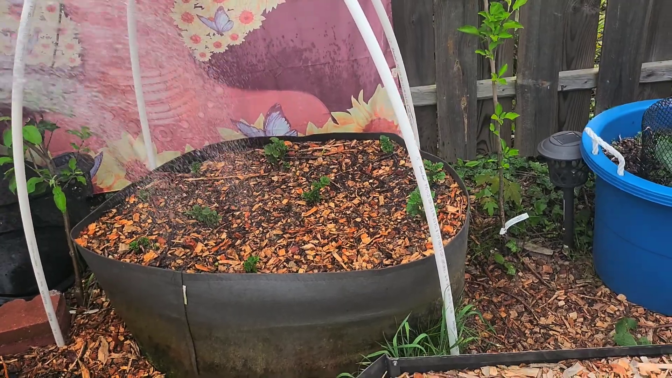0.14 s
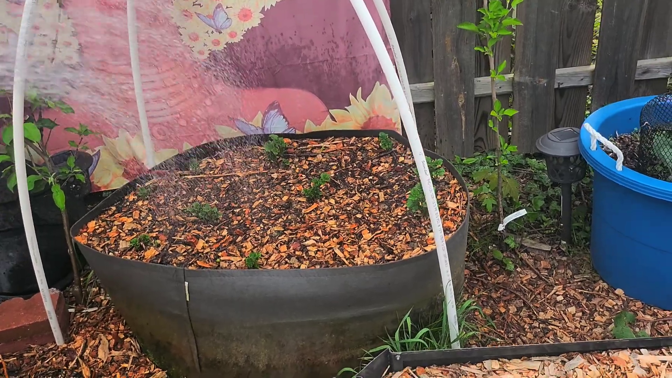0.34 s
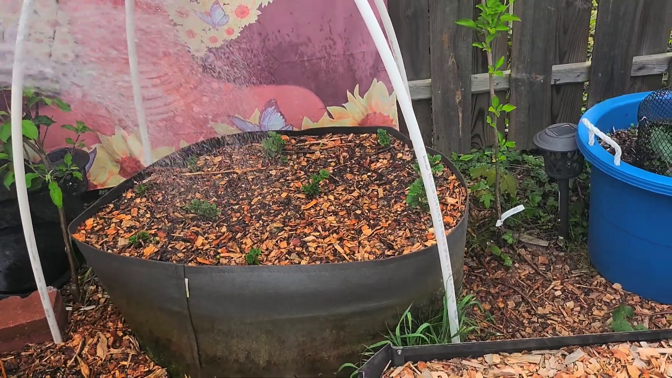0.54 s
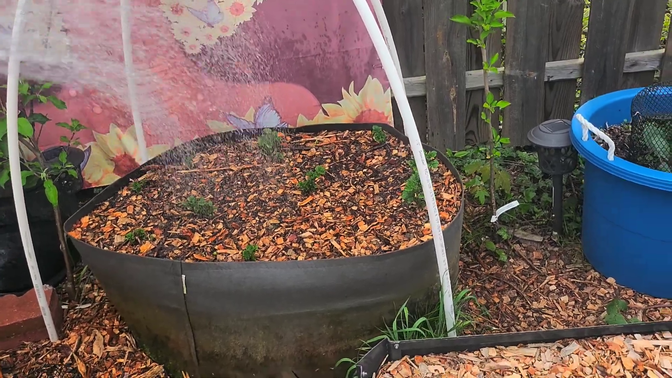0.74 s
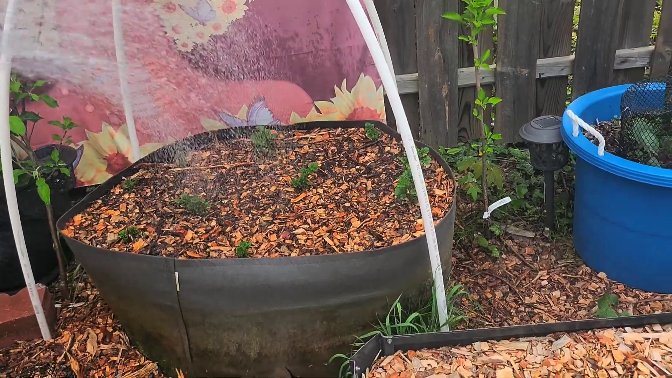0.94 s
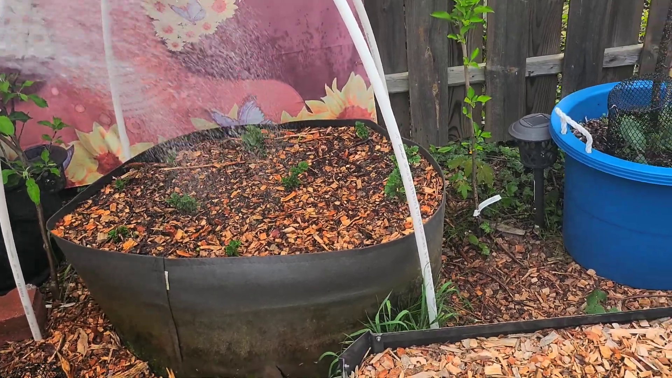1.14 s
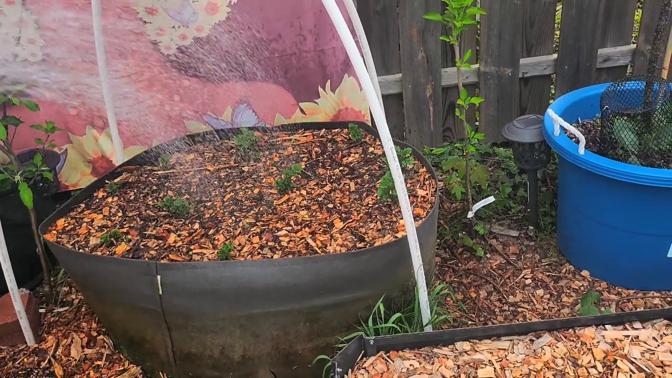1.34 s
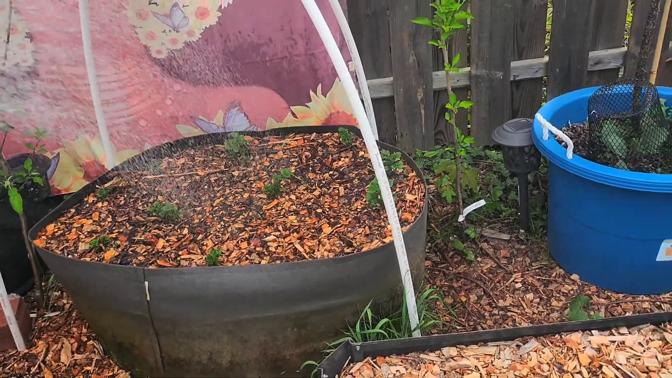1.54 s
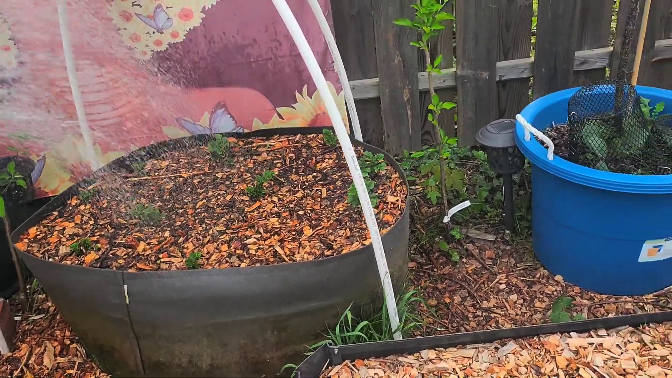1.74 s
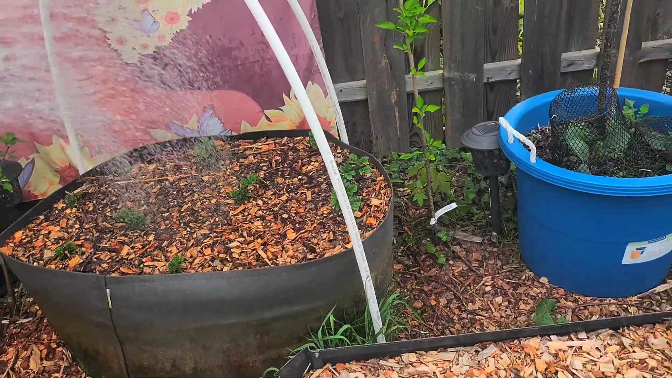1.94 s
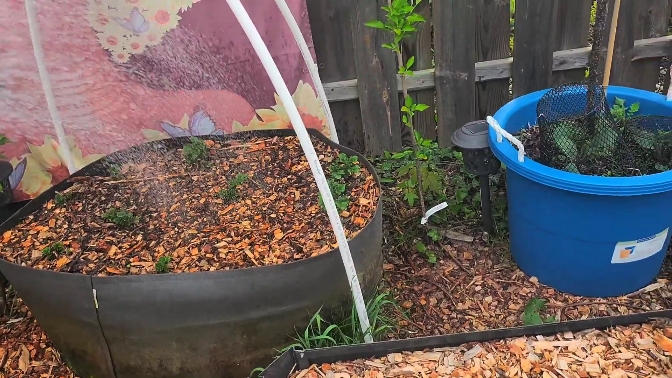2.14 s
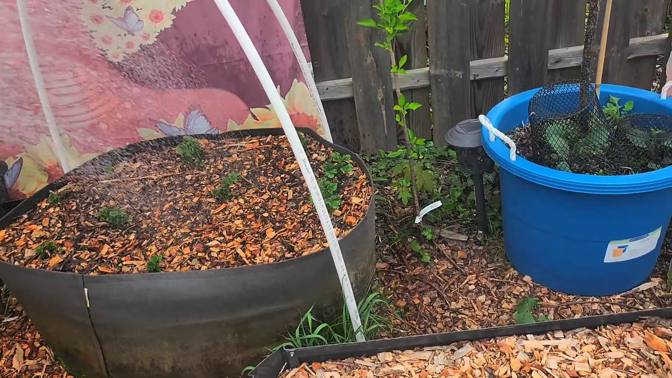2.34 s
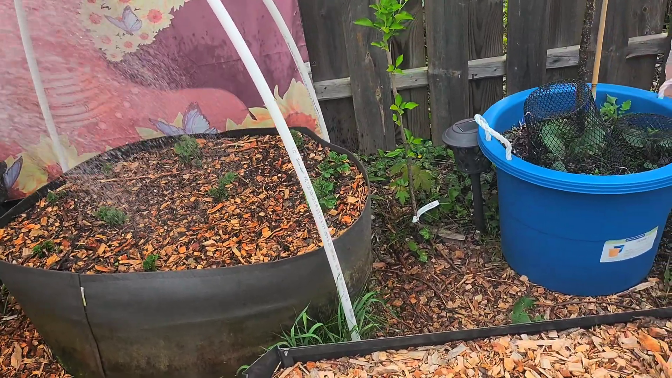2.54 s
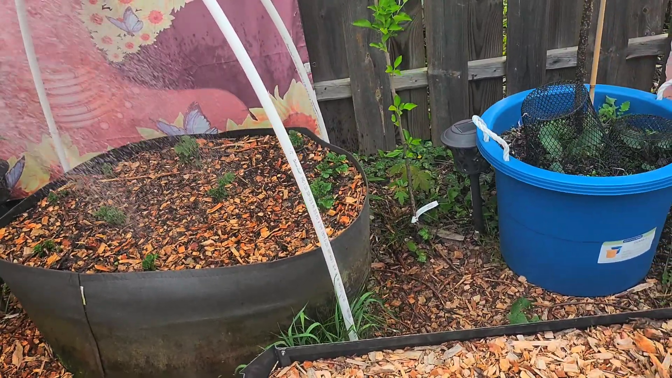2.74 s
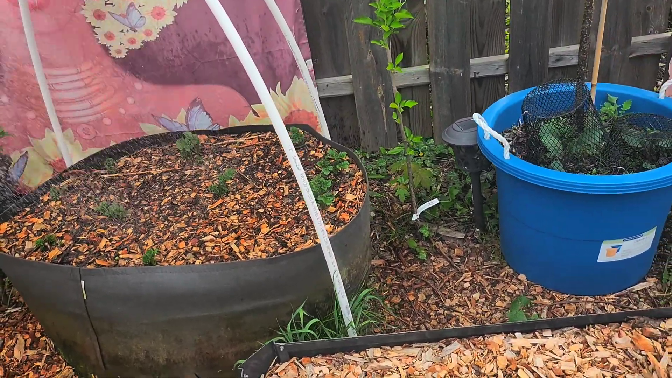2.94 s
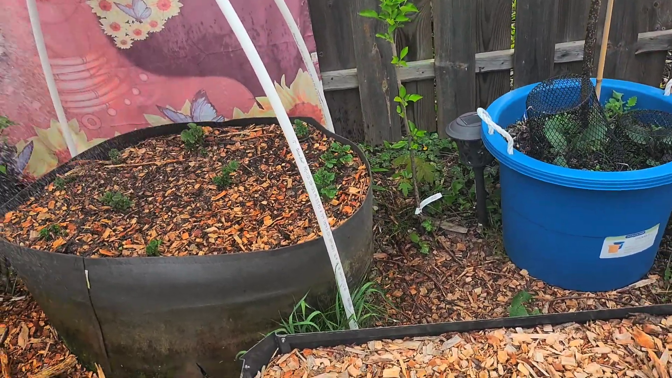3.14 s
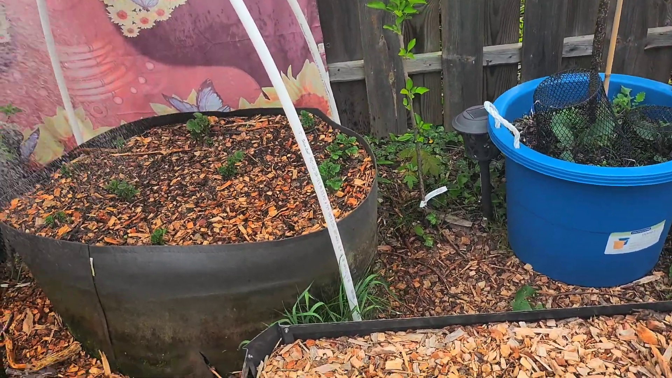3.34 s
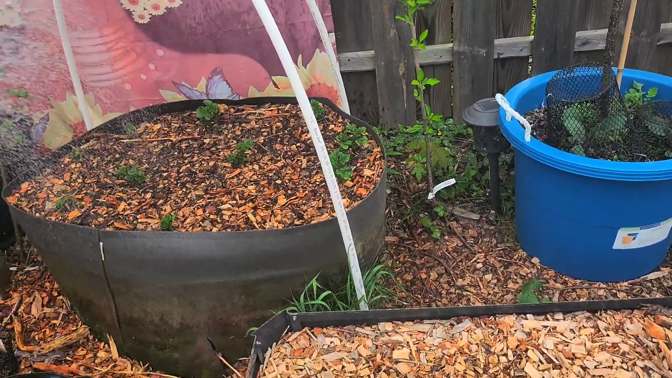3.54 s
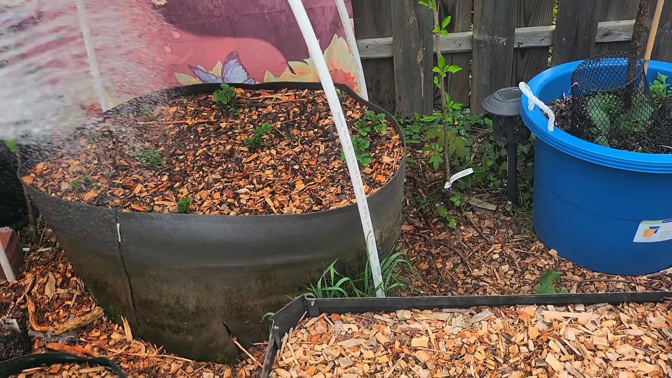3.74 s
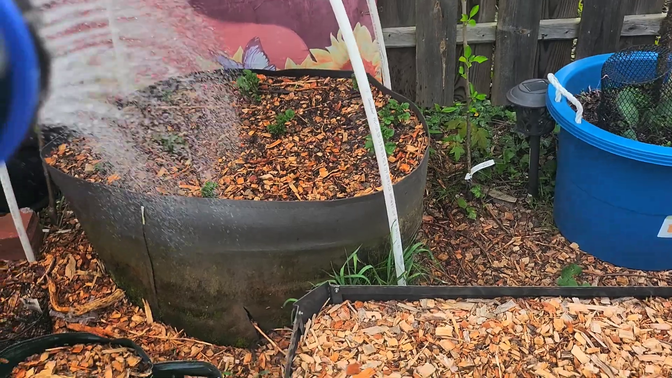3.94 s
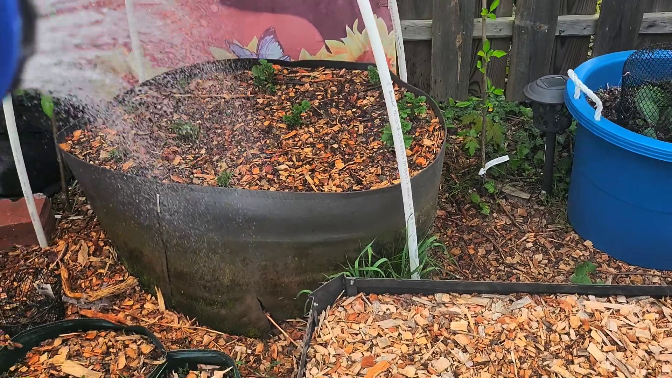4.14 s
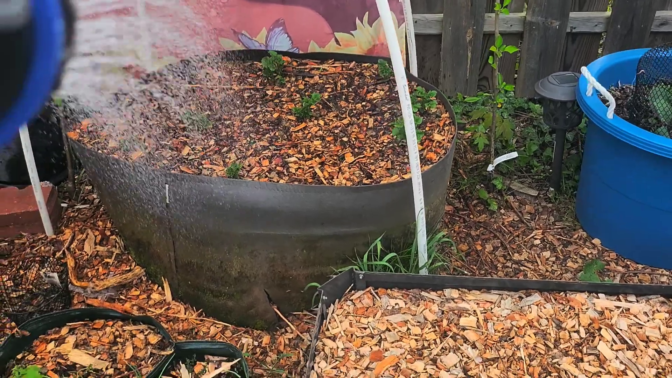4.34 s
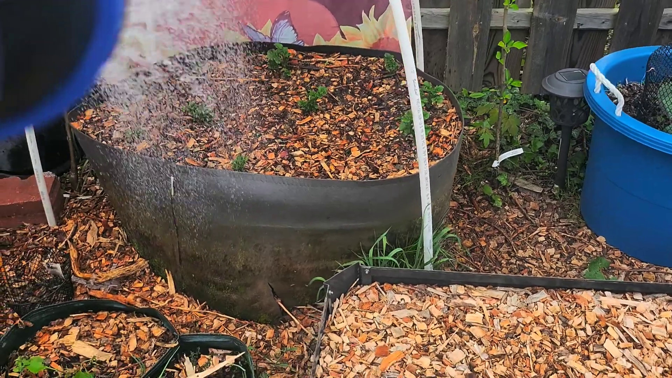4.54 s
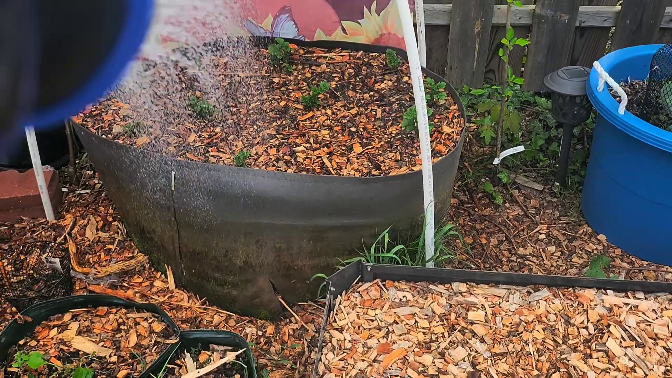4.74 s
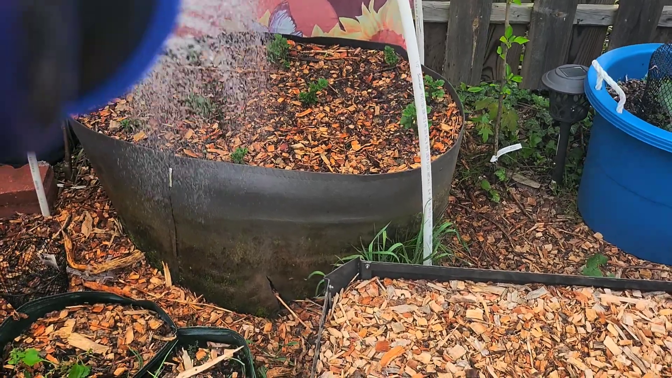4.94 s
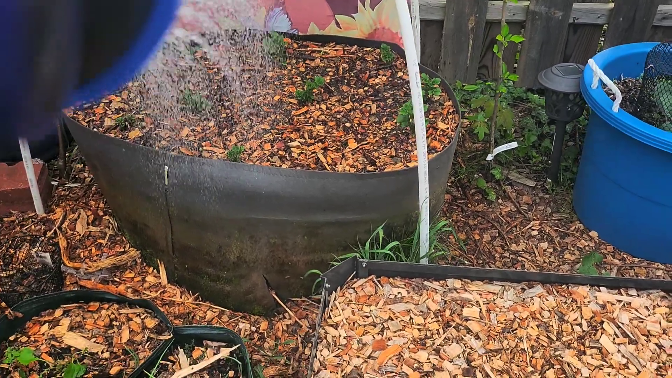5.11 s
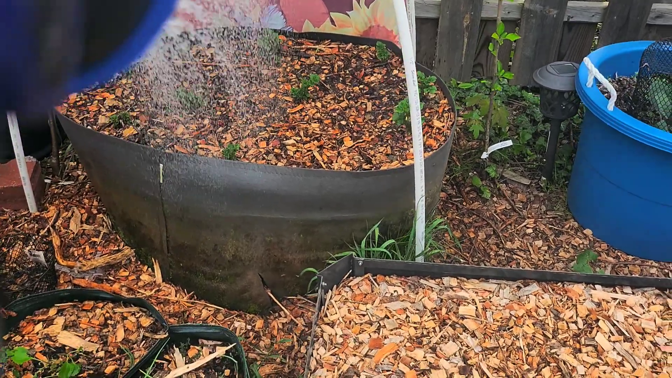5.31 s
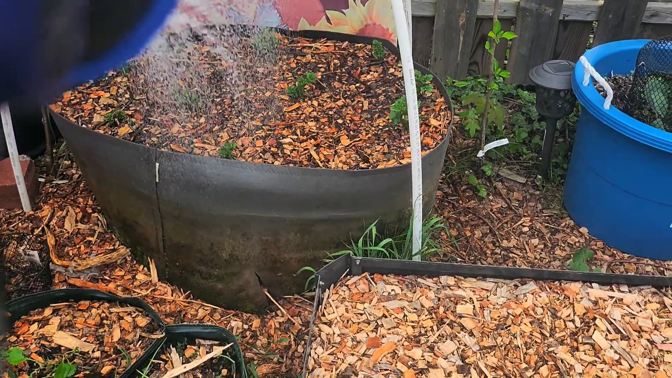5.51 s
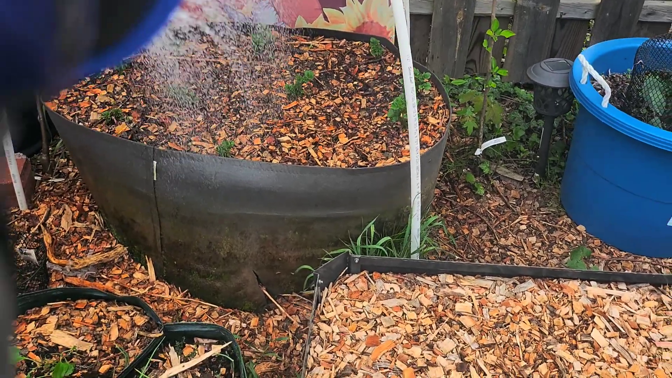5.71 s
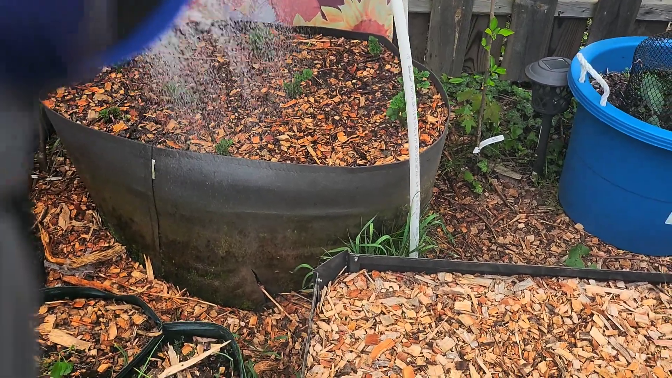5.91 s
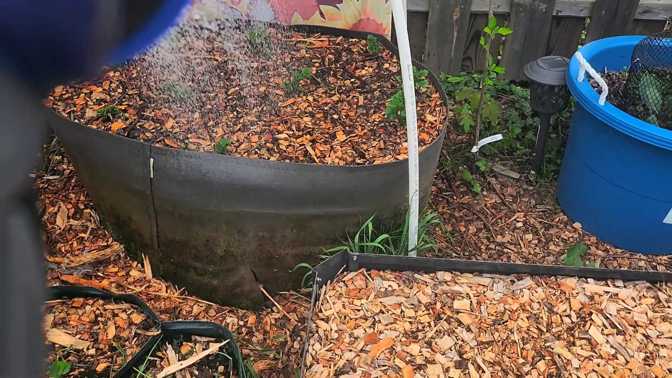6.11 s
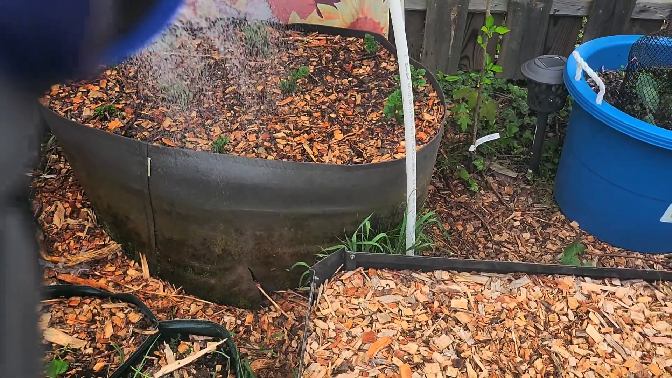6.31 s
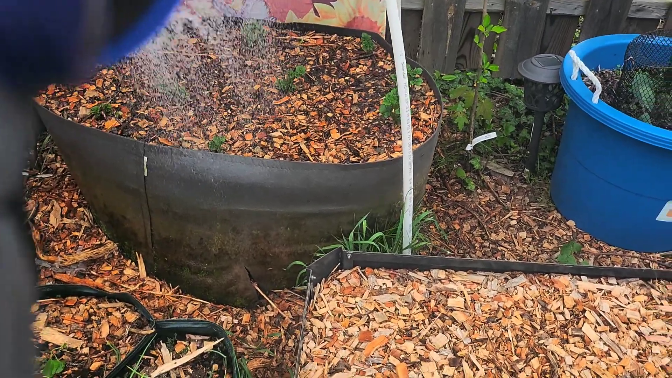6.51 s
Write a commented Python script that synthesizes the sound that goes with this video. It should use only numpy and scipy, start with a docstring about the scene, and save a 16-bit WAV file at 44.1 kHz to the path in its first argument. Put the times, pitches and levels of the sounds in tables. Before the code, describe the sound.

Constant airy water spray, stronger at left, shifts colour as the hand moves, over light pattering on mulch and a low far rumble.

```python
"""A hose nozzle left of a hand-held stereo microphone sprays a bed of wood mulch: noise shaped by a moving filter.
The hand moves it through six positions, each with its own reflections off hand and housing, so the hiss changes colour.
Water patters on the mulch as clicks over a noise wash, and a few heavy drops knock as damped sines.
Behind them far traffic rumbles as filtered noise, two engines drone as wavering sines and a far bird whistles."""
import sys
import numpy as np
from scipy import signal
from scipy.fft import rfft, irfft, next_fast_len
from scipy.io import wavfile
from scipy.ndimage import uniform_filter1d, map_coordinates

SR = 44100
rng = np.random.default_rng(int(sys.argv[2]) if len(sys.argv) > 2 else 0)


def store_pcm(level_fs):
    """Save levels as 16-bit WAV."""
    pcm = np.round(np.clip(level_fs, -1, 1) * 32767).astype(np.int16)
    wavfile.write(sys.argv[1], SR, np.atleast_2d(pcm).T)


def elevation(decibels):
    """Turn decibel levels (scalar or array-like) into linear amplitude ratios."""
    levels = np.asarray(decibels, float)
    return 10 ** (levels / 20)


N = 294147  # samples

# Flow through the nozzle. Each row: time in seconds, level in dB ahead of the housing's filter.
FLOW = [(0, -26.5), (2.6, -26.5), (3.1, -25.7), (3.6, -25.5), (3.8, -27), (4.05, -25.5), (4.3, -27),
        (4.75, -26.5), (6.3, -26.5), (6.67, -24.5)]
# The jet through the housing at the near (left) and shaded (right) microphone. Each row: frequency in Hz, gain in dB.
JET_NEAR = [(3310, -27), (4850, -8), (5180, -15), (6170, -5), (6730, -8), (7280, 3), (7940, -5), (8380, -2),
            (8930, -5), (9260, -1), (12240, 2), (13780, -6), (15440, 1), (15660, 0)]
JET_SHADED = [(3310, -19), (3530, -19), (3970, -12), (5620, -17), (5840, -21), (6060, -15), (6390, -18),
              (6950, -10), (7720, -7), (9150, -18), (9920, -15), (10360, -18), (11140, -13), (15660, -11)]
# What each of the six nozzle positions adds to those gains. Each row: frequency in Hz, gain in dB.
NEAR = [
    [(3310, 0), (4080, -11), (4850, -4), (5180, 4), (5840, -4), (7060, -3.5), (7940, 4.5), (8160, 2.5),
     (9700, -2.5), (9920, 0.5), (11690, -2.5), (13450, 5.5), (14110, -4), (15660, 2)],
    [(3310, -1), (3640, 1), (4080, -16.5), (5180, 3.5), (5620, -5), (7830, 4), (9590, -4), (9920, 1),
     (11800, -2), (12020, -0.5), (13560, 5.5), (13890, -6), (15210, 2), (15660, 2)],
    [(3310, 4), (4410, -8.5), (5510, 2.5), (6060, -6.5), (6620, 2.5), (6840, -14), (7060, -2), (8050, 2.5),
     (10030, -3.5), (13340, 3), (13780, 2), (14770, 4.5), (15320, 2), (15660, -2)],
    [(3310, -5), (3640, -11), (4080, 2.5), (5620, -6.5), (5950, 2), (6390, -5), (6620, 2), (8270, -4.5),
     (10030, -1.5), (10360, -9.5), (13120, 1.5), (13560, -6), (14990, 3.5), (15660, -1)],
    [(3310, -2), (3750, -1), (4190, 6), (5510, 0), (6060, 5), (7720, 0.5), (7940, -4), (8270, 1),
     (10690, 3.5), (13010, -6), (13780, -2), (14000, -3), (14880, -6), (15660, 1)],
    [(3310, -4.5), (4520, 10), (5400, -3.5), (5840, 6.5), (6280, 8), (6620, -7), (6840, 5), (7610, -4.5),
     (8490, 4.5), (11690, 7.5), (13560, -6.5), (14440, 3), (14990, 3), (15660, 0.5)],
]
SHADED = [
    [(3310, 4), (4520, 0), (5840, 3.5), (7280, 0), (7940, 8.5), (8490, -4), (8820, 4), (9480, -2),
     (9700, -7), (10030, 1), (11470, 4), (11910, -8), (15210, 8), (15660, 2)],
    [(3310, 4.5), (4200, 0), (4450, -2), (4900, 4), (5200, -1), (6500, 2), (6730, -3), (8050, 5),
     (8380, -9), (9370, 9), (9700, -6), (10030, 1), (12350, -4), (13010, -10), (13890, 4), (15100, 7),
     (15660, 2)],
    [(3310, 0), (4150, 0), (4400, -3), (4950, 3), (5500, -1), (6170, 0), (6390, 1), (6840, -2), (7060, 4),
     (8050, 5), (9260, 4), (10030, 2), (10250, -1), (11020, 4.5), (12680, -1), (13340, 2), (15100, 4),
     (15660, -3)],
    [(3310, -5), (4520, 2), (4700, 4), (4950, 9), (5730, -2), (5840, 5), (6280, -3), (6620, 2),
     (10250, 2.5), (11140, -3), (11800, 5), (13450, 2), (14330, -7), (15100, 2), (15660, 0)],
    [(3310, -2.5), (5070, 2), (5180, -5), (5400, 0), (7720, -3), (8380, 3), (9040, -4), (10470, 7),
     (11690, 0), (12130, 6), (12460, -4), (12900, 4), (15320, -6), (15660, 2)],
    [(3310, -0.5), (4520, -1), (5290, -6), (5510, 3), (7830, -1.5), (8160, -13), (8490, 4), (9700, -5),
     (10800, -5), (12570, 0.5), (13010, -8), (14110, 1), (14440, -8), (15660, -3)],
]
# How much further the shaded path's phase trails at each position. Each row: frequency in Hz, phase in radians.
TRAIL = [
    [(3310, 1), (3720, 2.5), (4410, -3.5), (4690, -1.3), (7030, 0.5), (7720, -0.3), (10200, 4.5),
     (10610, 5), (12270, 11), (13090, 14.2), (14610, 19.8), (15710, 24)],
    [(3310, 2.1), (3860, 2.5), (4130, 0), (4690, 4.9), (8130, 6), (9510, 9.9), (10890, 10.5), (11580, 15),
     (11990, 17.4), (13780, 22.0), (14060, 26), (15710, 28.3)],
    [(3310, 1.0), (4270, -1.5), (4690, 4.5), (7030, 8), (7580, 6), (8270, 6.8), (9920, 11), (10750, 11),
     (11710, 15), (12950, 13.5), (14190, 20), (15710, 20)],
    [(3310, 0), (4300, -0.7), (4600, -1.9), (4900, -1.5), (5170, -0.3), (6480, 1.8), (7030, 0.5),
     (7440, -0.5), (8410, 0.5), (12130, 6), (13510, 6.5), (13780, 3.4), (14330, -1), (15300, 10),
     (15710, 4)],
    [(3310, 3.1), (5370, 5.2), (6480, 17.1), (7440, 17.4), (8270, 14.1), (9780, 17.6), (10470, 24.2),
     (11160, 28), (12130, 34), (13780, 30.6), (14750, 32.9), (15710, 40.2)],
    [(3310, 2.2), (3450, 1), (4550, 5.55), (5240, 10.4), (6750, 14.6), (7440, 12.7), (8270, 19.2),
     (10060, 23), (10610, 22.5), (14750, 41), (15300, 46), (15710, 41)],
]
# Cancellations where paths round the housing meet at the shaded microphone. Each row: one position's centres in Hz.
NOTCHES_HZ = [
    [8450, 9700, 10550, 11850],
    [5840, 9700, 10500, 11700, 12950],
    [5440, 9100, 10330, 12500],
    [4400, 5200, 6260, 10450],
    [5240, 5750, 6420, 8950, 12500],
    [5030, 5330, 5830, 6400, 7300, 8230, 9000, 10200, 13350],
]
NOTCH_DB, NOTCH_HALF_WIDTH_HZ = 9, 90
# Likeness of the jet at the two microphones. Each row: frequency in Hz, likeness from 0 to 1.
JET_ALIKE = [(3500, .7), (4800, .9), (9000, .92), (15000, .8)]
# The hand moves the nozzle to its next position. Each row: start in seconds, length in seconds.
MOVES = [(0.39, 0.13), (1.15, 0.55), (2.66, 0.19), (3.618, 0.29), (4.25, 0.2)]
SETTLE_SHARE, SETTLE_S = 0.07, 0.2  # this share of each step creeps in after the move, with this time constant
FRAME = 1024  # samples in one slice of the moving filter
LAG_S = .000363  # sound from the left reaches the right microphone this much later

# Patter on the mulch. Each row: time in seconds, level in dB before the lift, lift of the left's upper half in dB.
PATTER = [(0, -54.5, -9), (.8, -56.5, -3.5), (1.4, -51.5, -11), (1.8, -57.5, -4), (2.7, -54, -7.5),
          (3.1, -58.5, -1), (3.8, -55, -1), (4.05, -51.5, -4.5), (5, -53, -2), (5.8, -55, 1.5),
          (6.67, -55.5, 2.5)]
# Colour of the bed at the left and right microphone. Each row: frequency in Hz, relative gain in dB.
PATTER_LEFT = [(470, 0), (560, -1), (1550, -6.5), (2020, 2), (2240, -5), (3010, -4), (3660, -20)]
PATTER_RIGHT = [(470, 6.5), (650, -2), (950, -1.5), (1250, -6.5), (1600, -4), (1900, -1), (2710, -9),
                (3140, 5), (3660, -5)]
# Further phase lag of the patter on the right. Each row: frequency in Hz, phase in radians.
PATTER_TRAIL = [(410, -0.7), (830, -1.0), (1100, -0.4), (1380, -1.2), (1650, -0.7), (2760, 2.7),
                (3580, 1.4)]
# Likeness of the patter at the two microphones. Each row: frequency in Hz, likeness from 0 to 1.
PATTER_ALIKE = [(400, .8), (600, .55), (1200, .35), (1700, .6), (2200, .4), (2600, .12), (3300, .15),
                (3600, .4)]

# Heavy drops. Each row: start in seconds, level in dB, pitch in Hz, cycles to fall 20 dB, left over right in dB.
DROPS = [(.829, -43.5, 1780, 8.1, -11), (1.18, -37, 1180, 5.5, -9), (1.223, -14, 1300, 0.63, -5),
         (1.296, -38, 580, 2, -6), (1.308, -35, 633, 2.4, -4), (1.37, -43, 920, 4, -2)]

# Spectrum of the traffic. Each row: frequency in Hz, relative level in dB.
RUMBLE = [(15, -45), (25, -27), (40, -14), (55, -1.5), (75, -3.5), (105, -3), (156, -9.5), (214, -8),
          (290, -17), (520, -22), (680, -58), (1140, -120)]
# Likeness of the traffic at the two microphones. Each row: frequency in Hz, likeness from 0 to 1.
RUMBLE_ALIKE = [(60, 0.93), (200, 0.95), (400, 0.79), (600, 0.072)]
TRAFFIC_DB, TRAFFIC_DB_PER_S, TRAFFIC_SWAY_DB = -44, -0.34, .5  # the rumble slowly recedes
# an engine's low note swells unevenly and comes nearer
DRONE_HZ, DRONE_DB, DRONE_DB_PER_S, DRONE_KNOTS_PER_S = 58.1, -52.5, 1.3, 8.5
# a second engine's two harmonics: starting pitch, its rise, and their levels
ENGINE_HZ, ENGINE_HZ_PER_S, ENGINE_DB, SECOND_DB = 87.5, 1.6, -50, -52.5
LEAVES_S, FADE_DB_PER_S = 2.2, 40  # it pulls away

# Whistles. Each row: start in seconds, length in seconds, first pitch in Hz, level on the left in dB.
BIRD = [(2.855, .14, 3165, -62), (2.99, .06, 3000, -65), (3.82, .085, 3165, -62), (3.94, .12, 3115, -64),
        (5.22, .08, 3195, -60), (5.31, .1, 3160, -62), (6.05, .18, 3145, -61)]
FALL_HZ, FLUTTER_DB, FLUTTER_KNOTS_PER_S = 45, 2.5, 48  # every whistle sags by the same step
TRILL_HZ, TRILL_DEPTH = 25.3, 0.6  # and pulses in level
TOP_HZ = 15750  # band limit


def along(points, hz):
    """Interpolation of (Hz, value) points on a logarithmic frequency axis."""
    f, v = np.transpose(points)
    return np.interp(np.log(hz + 1), np.log(f + 1), v)


def curves(rows):
    """Linear interpolation in time: one value per sample for each column after the time."""
    s, *columns = np.transpose(rows)
    return [np.interp(np.arange(N) / SR, s, column) for column in columns]


def unit(x):
    """Normalisation to an rms of 1."""
    return x / np.sqrt(np.mean(x ** 2))


def wobble(rate):
    """Smooth random modulation, slow or fast: a smooth curve through random knots, rate knots a second."""
    knots = rng.standard_normal(int(N * rate / SR) + 4)
    return map_coordinates(knots, [np.arange(N) * rate / SR])


def filtered(x, response):
    """Linear filtering: the spectrum of x times a complex response of frequency."""
    m = next_fast_len(N + 8192)
    return irfft(rfft(x, m) * response(np.fft.rfftfreq(m, 1 / SR)), m)[..., :N]


def edge(hz, corner_hz, order):
    """Butterworth magnitude: a high-pass gain, or a low-pass gain for a negative order."""
    return (1 + (corner_hz / (hz + 1)) ** (2 * order)) ** -.5


def patchy(depth_db):
    """Granular noise: white noise with patches of random gain in time and pitch."""
    z = signal.stft(rng.standard_normal(N), nperseg=256)[2]
    field = uniform_filter1d(rng.standard_normal(z.shape), size=4, axis=0)
    field = uniform_filter1d(field, size=10, axis=1)
    return unit(signal.istft(z * elevation(depth_db * unit(field)), nperseg=256)[1][:N])


def from_left(near, scattered, alike):
    """Arrival delay and partial coherence: the right hears near late, mixed with sound scattered by the garden."""
    late = filtered(near, lambda hz: along(alike, hz) * np.exp(-2j * np.pi * hz * LAG_S))
    diffuse = filtered(scattered, lambda hz: np.sqrt(1 - along(alike, hz) ** 2))
    return np.array([near, late + diffuse])


def nozzle():
    """Turbulent break-up: the jet tears into drops, a hiss sputtering at many speeds, coloured by where it is held."""
    quick_db = 0.3 * wobble(80) + 1.21 * wobble(600)
    slow_db = 0.38 * wobble(3.78) + 0.15 * wobble(27)
    sputter = elevation(curves(FLOW)[0] + slow_db + quick_db)
    jet = sputter * from_left(patchy(depth_db=0.69), patchy(depth_db=3.7), JET_ALIKE)
    _, t, z = signal.stft(jet, SR, nperseg=FRAME)
    gain = trembling(path(position(t)), t, depth=.006)
    return signal.istft(z * gain, nperseg=FRAME)[1][:, :N]


def position(t):
    """Motion with exponential settling: each move adds one to the position (0-5), quickly, then creeping."""
    start, length = np.transpose(MOVES)[:, :, None]
    quick = np.clip((t - start) / length, 0, 1)
    creep = 1 - np.exp(-np.maximum(t - start - length, 0) / SETTLE_S)
    return np.sum((1 - SETTLE_SHARE) * quick + SETTLE_SHARE * creep, axis=0)


def path(position):
    """Multipath transfer: each microphone's complex gain by frequency and time, gliding between held positions."""
    hz = np.fft.rfftfreq(FRAME, 1 / SR)
    first = np.minimum(position.astype(int), len(NEAR) - 2)
    share = (position - first)[:, None]

    def glide(held):
        return ((1 - share) * held[first] + share * held[first + 1]).T

    near_db = glide(np.array([along(JET_NEAR, hz) + along(s, hz) for s in NEAR]))
    shaded_held = [along(JET_SHADED, hz) + along(s, hz) - notches(hz, n) for s, n in zip(SHADED, NOTCHES_HZ)]
    shaded_db = glide(np.array(shaded_held))
    # gliding phasors turns the phase the shortest way round
    phase = np.angle(glide(np.exp(-1j * np.array([along(s, hz) for s in TRAIL]))))
    gain = np.array([elevation(near_db), elevation(shaded_db) * np.exp(1j * phase)])
    return gain * edge(hz, 3090, order=10)[:, None]


def notches(hz, centres_hz):
    """Destructive interference: the summed loss in dB around each cancelled frequency."""
    return sum(NOTCH_DB / (1 + ((hz - c) / NOTCH_HALF_WIDTH_HZ) ** 2) for c in centres_hz)


def trembling(gain, t, depth):
    """Path-length variation: the unsteady hand stretches the echo paths, so peaks and notches slide in pitch."""
    top = gain.shape[1] - 1
    stretch = 1 + depth * wobble(1.9)[np.minimum((t * SR).astype(int), N - 1)]
    bins = np.round(np.arange(top + 1)[:, None] * stretch).astype(int)
    return np.take_along_axis(gain, np.minimum(bins, top)[None], axis=1)


def patter():
    """Random impacts: dense small drops on wood chips, sparse clicks over a wash, through the bed's colour."""
    level_db, lift_db = curves(PATTER)
    hits = rng.random(N) < 900 / SR  # 900 a second on average
    clicks = unit(hits * elevation(0.95 * rng.exponential(size=N)) * rng.standard_normal(N))
    wash = from_left(patchy(depth_db=1.5) + 0.5 * clicks, patchy(depth_db=2.5), PATTER_ALIKE)
    wash[1] = filtered(wash[1], lambda hz: np.exp(-1j * along(PATTER_TRAIL, hz)))

    def colour(hz):
        band = edge(hz, 637, order=4) * edge(hz, 2895, order=-10)
        return elevation([along(PATTER_LEFT, hz), along(PATTER_RIGHT, hz)]) * band

    bed = unit(filtered(wash, colour))
    upper_left = filtered(bed[0], lambda hz: edge(hz, 1650, order=5))
    bed[0] += (elevation(lift_db) - 1) * upper_left
    return elevation(level_db + 0.31 * wobble(6.4)) * bed


def drops():
    """Damped oscillation: each heavy drop is a short knock with a sharp tick on top and a dull push under it."""
    out = np.zeros((2, N + SR))
    t = np.arange(SR // 20) / SR
    tick = -.33 * np.sin(2 * np.pi * 3100 * t) * elevation(-60 * t / 0.0023)
    push = 0.22 * np.sin(2 * np.pi * 260 * t) * elevation(-60 * t / 0.0096)
    onset = 1 - np.exp(-t / 0.00021)
    for s, db, hz, cycles, pan_db in DROPS:
        knock = -np.sin(2 * np.pi * hz * t) * elevation(-20 * t * hz / cycles)
        sides = elevation(db + np.array([[pan_db], [-pan_db]]) / 2)
        out[:, round(s * SR):][:, :len(t)] += sides * (knock + tick + push) * onset
    return out[:, :N]


def traffic():
    """Coherence of long waves: rumble of far engines and tyres, most alike at both microphones in the bass."""
    def turn(hz):
        return np.arccos(np.clip(along(RUMBLE_ALIKE, hz), -1, 1)) / 2

    def split(hz):
        return elevation(along(RUMBLE, hz)) * [np.cos(turn(hz)), np.sin(turn(hz))]

    mid, side = filtered(rng.standard_normal((2, N)), split)
    rumble = unit(np.array([mid + side, mid - side])) * elevation([[-.3], [.3]])
    level_db = TRAFFIC_DB + TRAFFIC_DB_PER_S * np.arange(N) / SR
    return elevation(level_db + TRAFFIC_SWAY_DB * wobble(2.93)) * rumble


def drone():
    """Amplitude and frequency modulation: an engine's low sine, wavering and growing louder."""
    t = np.arange(N) / SR
    throb = elevation(DRONE_DB + DRONE_DB_PER_S * t + 3.4 * wobble(DRONE_KNOTS_PER_S))
    return throb * np.sin(2 * np.pi * np.cumsum(DRONE_HZ + 2.447 * wobble(5.4)) / SR)


def engine():
    """Harmonic series: two wavering harmonics of a far motor, rising in pitch, then fading fast."""
    t = np.arange(N) / SR
    fade_db = -FADE_DB_PER_S * np.maximum(t - LEAVES_S, 0)
    turn = 2 * np.pi * np.cumsum(ENGINE_HZ + ENGINE_HZ_PER_S * t + 1.12 * wobble(6)) / SR
    first = elevation(ENGINE_DB + 1.6 * wobble(5.9)) * np.sin(turn)
    second = elevation(SECOND_DB + 0.83 * wobble(4.7)) * np.sin(2 * turn)
    return elevation(fade_db) * (first + second)


def bird():
    """Frequency-modulated tones: thin falling whistles, louder on the right, that pulse and flutter in level."""
    out = np.zeros(N + SR)
    flutter = elevation(FLUTTER_DB * wobble(FLUTTER_KNOTS_PER_S))
    waver_hz = 12 * wobble(35)
    for s, length, first_hz, db in BIRD:
        start = round(s * SR)
        u = np.linspace(0, 1, round(length * SR))
        pitch_hz = first_hz - FALL_HZ * u + waver_hz[start:][:len(u)]
        tone = np.sin(2 * np.pi * np.cumsum(pitch_hz) / SR)
        swell = np.sin(np.pi * u) ** 0.34
        trill = 1 - TRILL_DEPTH * np.cos(np.pi * TRILL_HZ * length * u) ** 2
        out[start:][:len(u)] += elevation(db) * swell * trill * tone
    return flutter * out[:N] * elevation([[0], [7]])


def scene():
    """Superposition: the pressures of all sources add."""
    return nozzle() + patter() + drops() + traffic() + drone() + engine() + bird()


def roll_off(x):
    """The treble ends steeply here."""
    return signal.sosfilt(signal.butter(12, 17110, fs=SR, output="sos"), x)


def record(dry):
    """Band limitation: nothing from TOP_HZ upward enters the finished mix."""
    mix = filtered(dry, lambda hz: hz < TOP_HZ)
    return roll_off(mix)


dry = scene()
out = record(dry)
store_pcm(out)
```